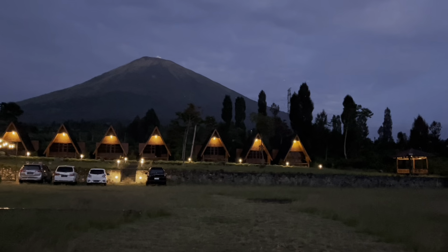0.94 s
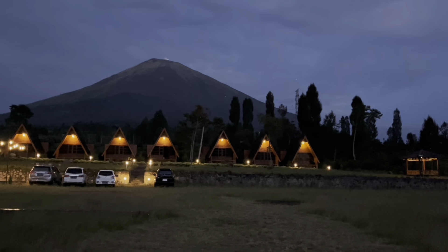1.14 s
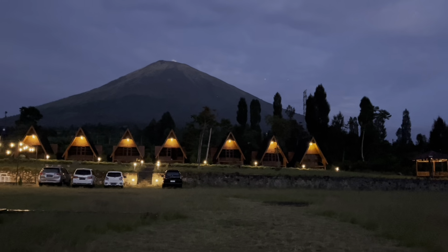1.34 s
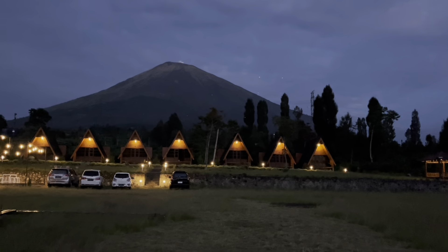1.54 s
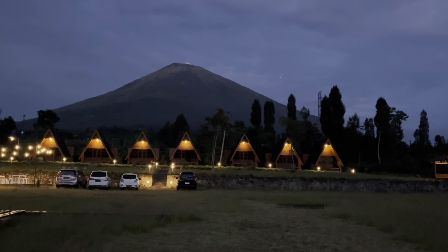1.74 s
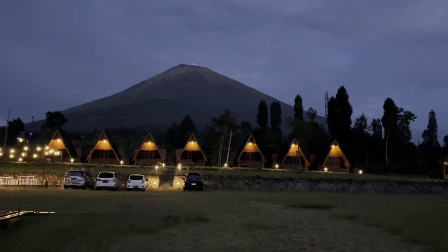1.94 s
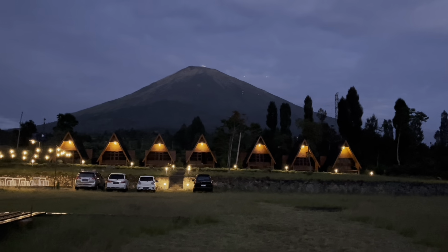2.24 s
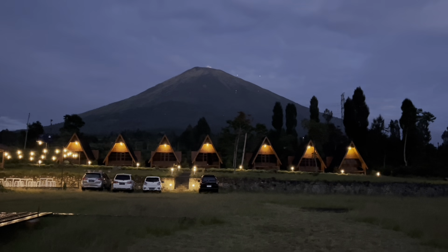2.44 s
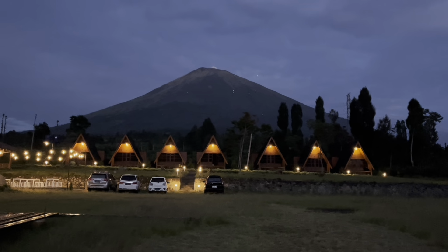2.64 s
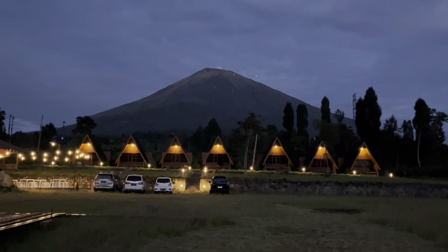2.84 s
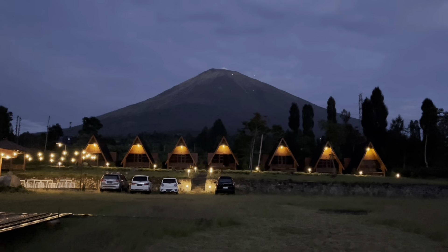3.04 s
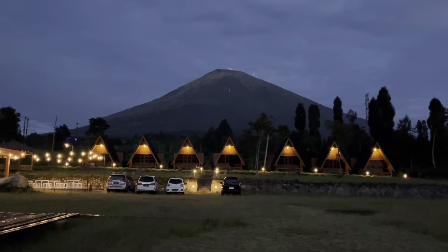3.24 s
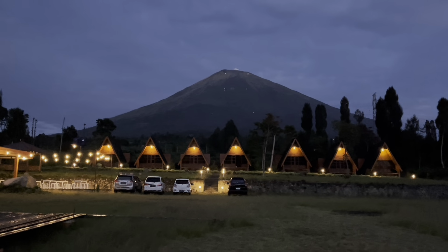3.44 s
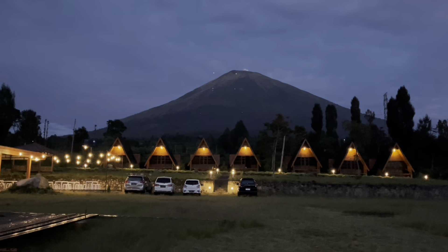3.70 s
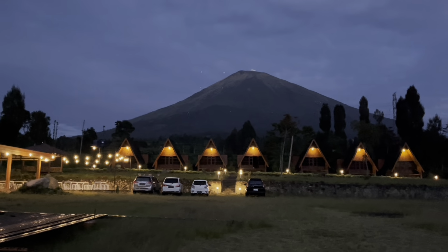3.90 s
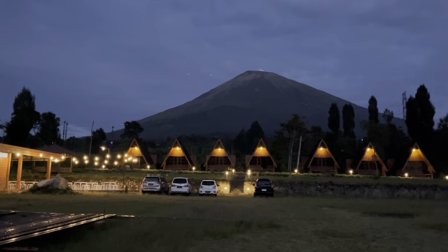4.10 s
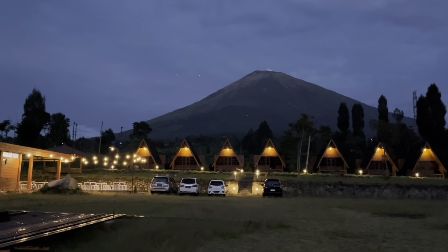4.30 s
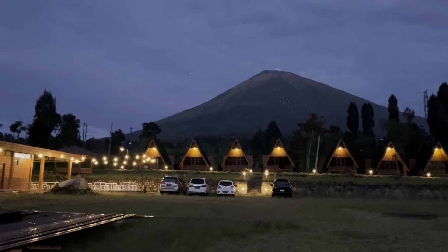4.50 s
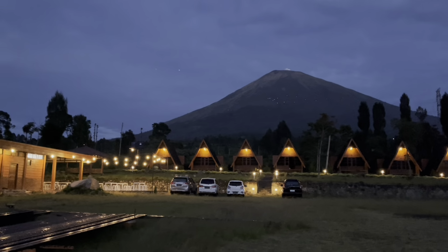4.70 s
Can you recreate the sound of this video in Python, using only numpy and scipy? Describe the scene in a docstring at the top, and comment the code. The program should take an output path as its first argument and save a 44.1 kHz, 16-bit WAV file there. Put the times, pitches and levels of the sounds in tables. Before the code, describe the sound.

Constant bright birdsong twitters across a quiet campground at dusk, above deep rumbling and the faint puttering of a distant motorbike.

```python
"""Dawn chorus on an open mountain field: small birds chirp, slur and trill as curved, gated sine glides.
Hundreds of farther notes and a noise haze merge into a twitter; decaying noise makes the tree-line echo.
Under it lie a low, lumpy rumble and the soft rush of the valley, both shaped noise, and a far
motorbike of puffs and thumps. A faint horn of two partials and a few dry noise ticks stand apart."""
import sys
import numpy as np
from scipy import signal
from scipy.fft import rfft, irfft, next_fast_len
from scipy.io import wavfile
from scipy.ndimage import uniform_filter1d, map_coordinates

SR = 44100
rng = np.random.default_rng(int(sys.argv[2]) if len(sys.argv) > 2 else 0)


def unload_audio(sound):
    """Save the sound as a 16-bit wav file, at the path given as the first command line argument."""
    columns = np.transpose(np.atleast_2d(sound))
    # keep every value between -1 and 1, then stretch to whole-number steps
    steps = np.round(np.clip(columns, -1, 1) * 32767)
    wavfile.write(sys.argv[1], SR, steps.astype(np.int16))


N = 214279
PORT_LAG = 0.0004245  # travel time of sound from the left port to the right (s)


def amp(db):
    """Decibels to gain."""
    return 10 ** (np.asarray(db) / 20)


def unit(x):
    """Scale to rms 1."""
    return x / np.sqrt(np.mean(x ** 2) + 1e-20)


def along(points, hz):
    """Read (f/Hz, value) points on a log frequency axis."""
    f, v = np.transpose(points)
    return np.interp(np.log(hz + 1), np.log(f + 1), v)


def curve(rows):
    """One value per sample from (t/s, value) rows."""
    return np.interp(np.arange(N) / SR, *np.transpose(rows))


def wobble(rate, size):
    """A smooth random curve, rate knots a second."""
    knots = rng.standard_normal(int(size * rate / SR) + 4)
    return map_coordinates(knots, [np.arange(size) * rate / SR])


def filtered(x, response):
    """x through a complex response of frequency."""
    m = next_fast_len(N + SR // 2)
    return irfft(rfft(x, m) * response(np.fft.rfftfreq(m, 1 / SR)), m)[..., :N]


def add(track, s, sound):
    """Mix a stereo sound into the track at time s."""
    start = max(round(s * SR), 0)
    part = track[:, start:start + sound.shape[1]]
    part += sound[:, :part.shape[1]]


def rush(spectrum, alike, pan_db=0):
    """Stereo noise of rms 1 that reaches the left port first; likeness sets the mid-side balance."""
    def mid_side_gains(hz):
        turn = np.arccos(np.clip(along(alike, hz), -1, 1)) / 2
        return amp(along(spectrum, hz)) * [np.cos(turn), np.sin(turn)]

    mid, side = filtered(rng.standard_normal((2, N)), mid_side_gains)
    right = filtered(mid - side, lambda hz: np.exp(-2j * np.pi * hz * PORT_LAG))
    return unit(np.array([amp(pan_db) * (mid + side), right]))


# A few faint dry ticks: t/s, level/dB (before gain and colour)
TICK_TIMES = [(0.2348, -70), (1.1742, -65), (3.446, -72)]
# Colour of a tick: f/Hz, gain/dB
TICK_COLOUR = [(800, -36), (2500, -5), (5000, 19), (7500, -8), (13000, -23)]


def ticks(t60=0.035, gain_db=9):
    """Faint dry ticks: bursts of noise that die within a blink, filtered to one colour."""
    track, t = np.zeros((2, N)), np.arange(SR // 20) / SR
    for s, db in TICK_TIMES:
        decay = amp(db + gain_db - 60 * t / t60)
        add(track, s - .002, decay * rng.standard_normal((2, len(t))))
    return filtered(track, lambda hz: amp(along(TICK_COLOUR, hz)))


# A faint far horn, one toot: t/s, length/s, f/Hz, level/dB
HORN_TOOT = (2.67, .25, 511, -53)


def horn(overtone_db=-12):
    """One soft toot from down the valley: a slightly unsteady tone and its octave."""
    s, length, hz, db = HORN_TOOT
    t = np.arange(N) / SR
    gate = np.sqrt(np.abs(np.sin(np.pi * np.clip((t - s) / length, 0, 1))))
    phase = 2 * np.pi * np.cumsum(hz + 2.1 * wobble(30, N)) / SR
    return amp(db) * gate * unit(np.sin(phase) + amp(overtone_db) * np.sin(2 * phase))


# A far one-cylinder motorbike: t/s, firing rate f/Hz, level/dB (before trim)
BIKE_RIDE = [(0, 23, -73), (1, 25.6, -51), (1.4, 27, -45), (1.898, 27, -44), (2.303, 25.8, -48),
             (2.749, 24.5, -45.5), (3.303, 26, -44), (3.699, 26.7, -52.5), (4.203, 26.6, -45),
             (4.86, 25.7, -47)]
# What is left of the exhaust colour: f/Hz, relative level/dB
EXHAUST_COLOUR = [(110, -29.5), (200, -2), (300, 6), (420, 2.5), (520, -4.5), (680, -9.5), (1200, -48.5),
                  (3000, -120)]


def motorbike(db=-1.9, pop_t60=0.044, scatter_db=0.8, pan_db=-7.5, thump_db=6):
    """Each firing sends out a thump and a short puff; distance leaves only their low middle."""
    s, rate, level_db = np.transpose(BIKE_RIDE)
    turns = np.cumsum(curve(np.column_stack([s, rate]))) / SR
    since_firing = turns % 1 / np.mean(rate)  # seconds, at the mean rate
    size_db = scatter_db * rng.standard_normal(int(turns[-1]) + 1)[turns.astype(int)]
    puffs = unit(amp(-60 * since_firing / pop_t60) * rng.standard_normal(N))
    thumps = unit(np.diff(np.floor(turns), prepend=0))

    def exhaust_at_ports(hz):
        ports = np.array([amp(pan_db) * np.ones_like(hz), np.exp(-2j * np.pi * hz * PORT_LAG)])
        return amp(along(EXHAUST_COLOUR, hz)) * ports

    pops = filtered(amp(size_db) * (puffs + amp(thump_db) * thumps), exhaust_at_ports)
    return amp(db + curve(np.column_stack([s, level_db]))) * unit(pops)


# Slow fader of the valley: t/s, level/dB (before trim)
VALLEY_FADER = [(0, -47.5), (1, -47), (1.8, -45.5), (2.8, -46.5), (4.86, -44.5)]
# Colour of the valley: f/Hz, relative level/dB
VALLEY_COLOUR = [(100, -11), (220, 0), (310, 2), (400, -2), (580, -9), (950, -6), (1500, -14), (2200, -17),
                 (3500, -24.5), (5000, -32.5), (6500, -45), (9500, -50), (13000, -44)]
# Width of the valley: f/Hz, left-right likeness (1 = same)
VALLEY_WIDTH = [(300, 0.52), (600, 0.6), (900, 0.3), (1500, 0.49), (4000, 0.56)]


def valley(db=1.5):
    """The soft rush of distant air and traffic: broad noise on a slow fader."""
    return amp(db + curve(VALLEY_FADER)) * rush(VALLEY_COLOUR, VALLEY_WIDTH)


# Colour of the rumble: f/Hz, relative level/dB
RUMBLE_COLOUR = [(20, -39), (31, -20.5), (40, -9), (52, -2.5), (70, 2.5), (100, -6), (135, -6.5),
                 (175, -15.5), (230, -30.5), (400, -78), (1500, -120)]
# Width of the rumble: f/Hz, left-right likeness (1 = same)
RUMBLE_WIDTH = [(50, 0.7), (110, 0.27), (250, 1)]
# Brief swells of the rumble: t/s, rise in level/dB
RUMBLE_SWELLS = [(0.331, 7.5), (0.57, 4.5), (0.85, 3.5), (1.37, 5.5), (1.85, 4.5), (2.25, 9), (2.499, 6),
                 (2.571, 6.5), (3.3, 2.5), (3.871, 3), (4.63, 5.5)]


def rumble(level_db=-29.5, swell_s=0.025, evenness=0.11, waver_db=-0.51):
    """A low, lumpy drone of slightly evened noise that wavers and now and then swells."""
    drone = rush(RUMBLE_COLOUR, RUMBLE_WIDTH, pan_db=-0.6)
    power = np.abs(uniform_filter1d(np.mean(drone ** 2, axis=0), SR // 16)) + 1e-6
    t = np.arange(N) / SR
    swell_db = sum(rise_db * np.exp(-((t - s) / swell_s) ** 2) for s, rise_db in RUMBLE_SWELLS)
    level = amp(level_db + swell_db + waver_db * wobble(22.12, N))
    return level * unit(drone / power ** (evenness / 2))


def syllable(length, glide_hz, pan_db, bearing, trill_hz=0, trill_rate=0, edge=0.00662, waver_hz=10,
             flutter_db=1.43, dip_db=7, overtone_db=-46):
    """One whistled note: a curved glide, which a trill breaks into a chain of little arches."""
    t = np.arange(int((max(length, .01) + edge) * SR)) / SR
    u = np.clip((t - edge / 2) / length, 0, 1)
    glide = np.polyval(np.polyfit([0, .5, 1], glide_hz, 2), u)
    arch = np.abs(np.sin(np.pi * trill_rate * (t - edge / 2))) - 2 / np.pi
    trilling = np.clip(trill_hz / 300, 0, 1)
    knots = rng.standard_normal((2, 64))
    waver, flutter = [map_coordinates(k, [t * 200], mode="mirror") for k in knots]
    # trilled notes are also less steady in pitch
    pitch = glide + trill_hz * arch + waver_hz * (1 + 1.86 * trilling) * waver
    # a bird to one side reaches the farther port later
    lag = np.array([[0], [PORT_LAG * np.sin(np.radians(bearing))]])
    phase = 2 * np.pi * (np.cumsum(pitch) / SR - pitch * lag)
    gate = np.sin(np.pi / 2 * np.clip(np.minimum(t, t[-1] - t) / edge, 0, 1)) ** 2
    swell = 1.0 + 0.2 * np.sin(np.pi * u)
    # with dip_db, the voice drops between arches
    loudness = unit(gate * swell * amp(flutter_db * flutter + dip_db * trilling * arch))
    ports = unit(amp([[pan_db / 2], [-pan_db / 2]]))
    return ports * loudness * (np.sin(phase) + amp(overtone_db) * np.sin(2 * phase))


def notes(rows, first, last, trill_hz=0, trill_rate=0, db=0, waver_hz=20, lead=0.00199,
          usual_s=0.042, stretch=.35):
    """Glide from first to last semitones about each middle pitch; longer notes glide farther."""
    song = np.zeros((2, N))
    octaves = np.array([first, 0, last]) / 12
    for s, length, hz, level_db, pan_db, bearing in rows:
        glide_hz = hz * 2 ** (octaves * (length / usual_s) ** stretch)
        note = syllable(length, glide_hz, pan_db, bearing, trill_hz, trill_rate, waver_hz=waver_hz)
        add(song, s - lead, amp(db + level_db) * note)
    return song


def perched(rows, pan_db, bearing):
    """Give all the rows one direction."""
    return [(*row, pan_db, bearing) for row in rows]


# Colour of the distant twitter: f/Hz, relative level/dB
TWITTER_COLOUR = [(1000, -65.5), (1600, -32.5), (1950, -10.5), (2300, -11), (2800, -9.5), (3250, -5),
                  (3700, -5.5), (4400, -20.5), (5200, -20.5), (6200, -47.5), (9000, -89.5)]


def haze(level_db=-11, swing_db=2.7):
    """The blur of the farthest birds: twitter-coloured noise with a restless level."""
    level = amp(level_db + swing_db * wobble(8.0, N))
    return level * rush(TWITTER_COLOUR, [(3000, 0.066)], pan_db=12.0)


def far_birds(count=800, low_hz=2250, high_hz=3150, slide=0.0626, length=0.035, trill_hz=150,
              trill_rate=58, scatter_db=1.2):
    """A crowd of like notes from all sides, dulled by distance."""
    song = np.zeros((2, N))
    times = (np.arange(count) + rng.random(count)) / count * N / SR
    pitches = low_hz * (high_hz / low_hz) ** rng.random(count)
    variations = rng.standard_normal((count, 8))
    for s, hz, (slope, bend, span, depth, speed, size, side, turn) in zip(times, pitches, variations):
        fall = np.exp(slide * (slope + .5))
        glide_hz = hz * fall, hz * np.exp(0.0329 * bend), hz / fall
        trill = trill_hz * abs(depth), trill_rate * np.exp(0.23 * speed)
        note = syllable(length * np.exp(0.22 * span), glide_hz, 2 + 4 * side, 35 * turn, *trill)
        add(song, s - length / 2, amp(scatter_db * size) * note)
    # half the colour in dB: the notes already lie in the twitter's band
    return unit(filtered(song, lambda hz: amp(along(TWITTER_COLOUR, hz) / 2)))


# Decay of the tree-line echo: f/Hz, t60/s
TREE_DECAY = [(1000, 0.34), (3000, 0.25), (9000, 0.22)]


def tree_line(x, delay=0.0083):
    """Trunks and leaves scatter the song into a soft tail, different at each port."""
    hz, t, z = signal.stft(rng.standard_normal((2, SR * 3 // 4)), SR, nperseg=256)
    decay = amp(-60 * t / along(TREE_DECAY, hz)[:, None])
    build_up = 1 - np.exp(-t / delay)
    tail = signal.istft(z * decay * build_up, SR, nperseg=256)[1]
    return signal.fftconvolve(x, tail / np.linalg.norm(tail[0]), axes=1)[:, :N]


# Very high, thin squeaks: t/s, length/s, f/Hz, level/dB (before trim)
SQUEAK_NOTES = [(0.313, 0.027, 9800, -70), (0.328, .026, 7100, -70), (0.438, 0.053, 9400, -67),
                (1.41, 0.035, 10160, -71), (1.555, 0.034, 6150, -68.5), (1.772, 0.016, 7322, -73),
                (2.225, 0.031, 9600, -74), (2.328, 0.033, 9100, -76), (4.29, 0.022, 8900, -80)]


def squeaks():
    """Very high, thin trilled notes that sag slightly."""
    return notes(perched(SQUEAK_NOTES, pan_db=0.0, bearing=4.9), first=0.38, last=-0.45,
                 trill_hz=420, trill_rate=62, db=-1.0)


# Thin trills about one pitch: t/s, length/s, f/Hz, level/dB (before trim)
THIN_TRILL_NOTES = [(0.054, 0.062, 4100, -59), (0.0026, .29, 5080, -69.5)]


def thin_trills():
    """Long, thin trills that arch about a level pitch."""
    return notes(perched(THIN_TRILL_NOTES, pan_db=13.0, bearing=5.4), first=0.035, last=0.073,
                 trill_hz=220, trill_rate=64, db=1.5)


# Nearly level rasps: t/s, length/s, f/Hz, level/dB (before trim)
RASP_NOTES = [(0.622, 0.023, 4150, -58), (0.641, 0.11, 4190, -49.5), (0.648, 0.025, 3710, -47.5)]


def rasps():
    """Nearly level notes with arches too fast to hear as a trill."""
    return notes(perched(RASP_NOTES, pan_db=5.5, bearing=0.81), first=.15, last=-0.079,
                 trill_hz=330, trill_rate=215, db=-0.5, waver_hz=22)


# Short rising buzzes: t/s, length/s, f/Hz, level/dB (before trim)
BUZZ_NOTES = [(1.228, 0.024, 3800, -55.5), (1.322, 0.027, 3950, -56), (1.446, 0.016, 3830, -51),
              (1.605, 0.025, 3660, -53), (2.125, 0.048, 3700, -60.5), (3.125, 0.07, 3770, -59.5),
              (3.262, 0.037, 4050, -57), (3.345, 0.032, 4280, -58), (3.428, 0.024, 4610, -58.5),
              (3.565, 0.02, 4540, -60), (3.835, 0.031, 4150, -63), (4.238, 0.061, 3780, -53),
              (4.272, 0.046, 4340, -59), (4.368, 0.022, 3550, -52.5), (4.372, 0.02, 4400, -60)]


def buzzes():
    """Short rising notes roughened by very fast arches."""
    return notes(perched(BUZZ_NOTES, pan_db=6.0, bearing=7.4), first=-1.0, last=0.6,
                 trill_hz=340, trill_rate=215, db=2.0, waver_hz=30)


# One bird's runs of high chips: t/s, f/Hz, level/dB (before scatter and trim)
CHIP_RUNS = [(1.125, 4300, -57), (1.186, 4430, -57.5), (1.252, 4450, -55), (1.321, 4500, -56),
             (1.393, 4440, -55), (1.464, 4400, -57), (2.636, 4780, -59.5), (2.684, 4600, -63)]


def chipper(length=0.025, scatter_db=-0.5):
    """One bird ticks off chips that drop ever faster, each a little different."""
    rows = [(s, length, hz, db + scatter_db * rng.standard_normal()) for s, hz, db in CHIP_RUNS]
    return notes(perched(rows, pan_db=4.5, bearing=-6.0), first=0.72, last=-1.5, db=1.0, waver_hz=24)


# A faint bird's drawn-out whistles: t/s, length/s, f/Hz
WHISTLE_NOTES = [(1.32, 0.28, 2137), (2.081, 0.3, 2075), (2.641, 0.086, 2136), (2.918, 0.25, 2070),
                 (3.722, .22, 2060), (4.406, 0.12, 2110)]


def long_whistles(level_db=-55):
    """A faint bird draws out a slowly rising pure note."""
    rows = [(*row, level_db) for row in WHISTLE_NOTES]
    return notes(perched(rows, pan_db=2.5, bearing=1.5), first=-0.42, last=0.39)


# One bird's repeated low slur: t/s, length/s, f/Hz, level/dB (before trim), left-right/dB
SLUR_NOTES = [(0.116, 0.047, 2276, -34.5, -0.5), (0.899, 0.046, 2272, -36, 0),
              (1.675, 0.05, 2388, -37, 3.5), (2.444, 0.041, 2327, -34, 5.5),
              (2.922, 0.027, 2350, -35.5, 6.5), (3.327, 0.043, 2330, -35, 5.5)]


def slurs(bearing=-6.5):
    """One bird repeats a low falling note that flattens out."""
    rows = [(*row, bearing) for row in SLUR_NOTES]
    return notes(rows, first=1.2, last=-0.5, db=-2.0)


# Peeps: t/s, length/s, f/Hz, level/dB (before trim), left-right/dB, bearing/degrees to the left
PEEP_NOTES = [(0.002, 0.0061, 2870, -38.5, 3, 10), (0.236, 0.012, 2720, -43, -1, -2.5),
              (0.275, 0.066, 2640, -47.5, -3, -3), (0.388, 0.046, 3100, -40.5, 2.5, 19),
              (0.517, 0.042, 3124, -36.5, 1, 11), (1.29, 0.048, 2355, -43.5, 11, 14),
              (1.56, 0.083, 2780, -43.5, 6.5, -9), (1.865, 0.039, 3190, -53, 3, 12.5),
              (1.885, 0.086, 2290, -45, 7.5, -13.5), (2.175, 0.032, 2515, -44.5, 1, 0),
              (3.822, 0.021, 2360, -48, 4, 9), (2.28, 0.04, 3167, -40, 0.5, 8),
              (3.625, 0.037, 2646, -39.5, 8, 20.5), (3.675, 0.14, 2686, -42.5, 10, 19),
              (3.73, 0.011, 2505, -34.5, 5.5, 9), (3.792, 0.017, 2975, -45.5, 18, 13),
              (3.88, 0.02, 2954, -38, 5.5, 16), (4.365, 0.047, 2583, -45.5, 0, -0.5),
              (4.477, 0.017, 3260, -41, 1, 6.5), (4.635, 0.11, 2683, -40, 4, 19.5),
              (3.25, 0.09, 2800, -49, 4, 5), (4.06, 0.076, 2790, -55, 1, 10),
              (4.71, 0.0085, 2980, -40, 2, 13), (4.79, 0.024, 2634, -37.5, 4, 15)]


def peeps():
    """Birds all around peep on almost one pitch."""
    return notes(PEEP_NOTES, first=-0.14, last=-0.11, db=2.5, waver_hz=5.6)


# Notes that scoop, arch or drop: t/s, length/s, first f/Hz, middle f/Hz, last f/Hz,
# level/dB (before trim), left-right/dB, bearing/degrees to the left
GLIDE_NOTES = [(0.039, 0.032, 3490, 3120, 2610, -46, 4, 13),
               (0.072, 0.031, 2480, 2400, 2460, -46.5, 3, -3.5),
               (0.087, .018, 3570, 3280, 3050, -46, 3, 21.5),
               (0.089, 0.035, 2720, 2600, 2400, -46, 0.5, -9), (0.104, 0.029, 2834, 2750, 2950, -44, 2, 5),
               (0.136, 0.043, 3250, 2980, 3090, -46, -3, 9), (.307, 0.034, 3060, 3230, 3290, -39, 6.5, -4),
               (.485, 0.051, 3200, 2810, 2450, -42, 6, -6), (0.525, 0.013, 2610, 2200, 1650, -50, 2.5, -3),
               (0.826, 0.041, 3080, 2530, 2460, -46, 2, -11),
               (1.003, 0.029, 3470, 3400, 3310, -53.5, 5.5, 10),
               (1.018, 0.035, 3000, 2720, 2450, -64, -1, 0), (1.112, 0.033, 3100, 2960, 2710, -47.5, -5, 4),
               (1.235, .016, 3100, 3490, 3640, -43.5, 4, -17),
               (1.277, 0.025, 1910, 1930, 2440, -51.5, 4, 26),
               (1.488, 0.027, 3450, 3300, 2860, -44.5, 7, -9.5),
               (1.524, 0.031, 3620, 3470, 3130, -47, 6, -7.5), (1.61, .04, 3170, 2960, 2790, -46, 12, -11),
               (1.611, 0.033, 2894, 2530, 2500, -45.5, 0, 15), (1.622, .017, 2220, 2140, 2070, -46, 2, -4),
               (1.753, 0.024, 3620, 3930, 3520, -49, 7, 11),
               (1.835, 0.02, 2767, 2550, 2490, -44.5, 11, -10),
               (1.933, 0.032, 2360, 2385, 2720, -42.5, 7.5, -14),
               (1.979, 0.035, 3120, 3073, 3004, -38, 2, 13.5),
               (2.025, 0.078, 2430, 2520, 2480, -47.5, 0.5, -3.5),
               (2.07, 0.042, 2990, 2930, 2950, -39, -1, 10), (2.184, .063, 2870, 3155, 3080, -44, 5, 13),
               (2.213, 0.065, 2655, 2510, 2200, -42.5, -0.5, -2),
               (2.288, 0.032, 2110, 2000, 1870, -50.5, 5, -20),
               (2.482, 0.026, 4180, 4070, 3390, -61, 13, -9),
               (2.486, 0.021, 2695, 2650, 2310, -44, 19.5, -29),
               (2.519, 0.037, 2490, 2800, 2920, -41, 8, -28),
               (2.55, 0.074, 2770, 2607, 2500, -39.5, 5, -18),
               (2.627, 0.021, 2240, 1895, 1530, -49.5, 5, -12),
               (2.675, 0.039, 2616, 2560, 2370, -47, 0, -2), (2.796, 0.072, 2880, 2830, 2710, -46.5, 3, 20),
               (2.832, 0.044, 2187, 2420, 2906, -44, 5, -6), (3.211, 0.018, 3700, 3070, 2740, -48.5, 1, 13),
               (3.396, 0.028, 2570, 2750, 2620, -45.5, -1.5, 4.5),
               (3.419, 0.029, 2546, 2780, 3160, -41, 0, 8.5),
               (3.445, 0.028, 3000, 2624, 2300, -44.5, -2.5, -1.5),
               (3.556, 0.039, 2695, 2910, 2860, -48, 13, 23),
               (3.766, 0.026, 3520, 3220, 2880, -39.5, 2, 15), (3.793, 0.016, 2960, 3030, 2680, -36, 9, 11),
               (3.894, 0.036, 3374, 3060, 2850, -43, 6, 11), (3.943, 0.015, 2620, 2440, 2480, -43, 5, 10),
               (4.297, 0.043, 3035, 2570, 2256, -49, -1, 4), (4.454, 0.018, 2930, 3015, 3480, -38, 0, 8.5),
               (4.513, 0.016, 3870, 3600, 3000, -56, 4, 9.5),
               (4.527, 0.022, 2945, 2830, 2830, -34, -2.5, 6),
               (4.544, 0.027, 2850, 3100, 3050, -37.5, 0, 12.5),
               (4.572, 0.027, 3194, 3150, 2900, -34.5, 2.5, 11),
               (4.581, 0.038, 2663, 2540, 2970, -39, 0, -5), (4.611, 0.043, 2870, 2680, 2230, -43, 1, 7),
               (4.623, 0.01, 3380, 3430, 3660, -42.5, 3.5, -16.5),
               (4.649, 0.019, 3536, 3410, 3230, -39, 5, -14.5),
               (4.77, 0.024, 2640, 2380, 1960, -46.5, 18, 30)]


def glides(trim_db=2.5, rough_hz=15, rough_rate=50, lead=0.001989):
    """Nearly pure notes bend through three pitches, with a trace of trill."""
    song = np.zeros((2, N))
    for s, length, *glide_hz, db, pan_db, bearing in GLIDE_NOTES:
        note = syllable(length, glide_hz, pan_db, bearing, rough_hz, rough_rate)
        add(song, s - lead, amp(db + trim_db) * note)
    return song


# Trills, mostly falling: t/s, length/s, first f/Hz, middle f/Hz, last f/Hz, level/dB (before trim),
# left-right/dB, bearing/degrees to the left, trill depth f/Hz, arch rate f/Hz
TRILL_NOTES = [(0.001, 0.055, 3240, 3050, 2880, -37, 1, 18.5, 220, 32.8),
               (0.326, 0.051, 3420, 3620, 3330, -48, 0, -9, 380, 65),
               (0.382, 0.043, 2820, 3006, 2710, -39.5, 0, 1, 480, 33),
               (0.406, 0.11, 3420, 3250, 3130, -39.5, 6, -8.5, 260, 50),
               (0.534, 0.048, 3285, 3410, 3000, -52.5, 3, 5, 382, 57),
               (0.569, 0.04, 3030, 2755, 2400, -41.5, -2.5, 4.5, 500, 57),
               (0.696, 0.074, 3820, 3360, 2990, -38, 2.5, 14.5, 398, 65),
               (0.778, 0.04, 3330, 3320, 3100, -46, 7, -3, 120, 45),
               (0.916, 0.038, 3390, 3350, 3400, -48.5, 3, 14.5, 120, 49),
               (1.133, 0.053, 3490, 3177, 2990, -38, 2, 3, 300, 66),
               (1.307, 0.043, 3190, 3175, 2840, -39, 7, 12, 290, 32),
               (1.349, 0.034, 3310, 3276, 3260, -37, 9, -5.5, 261, 64),
               (1.385, 0.053, 3800, 3475, 3120, -39, 3, 17.5, 480, 46),
               (1.389, 0.052, 3080, 3150, 3370, -42, 1, -1, 200, 74),
               (1.681, 0.032, 3110, 3085, 3110, -43.5, 2, 9, 120, 35),
               (1.755, 0.039, 3380, 3220, 2920, -37.5, 1, 7, 398, 62),
               (1.78, 0.032, 3334, 3280, 3100, -36.5, 0, 13, 220, 60),
               (2.33, 0.057, 2955, 2834, 2520, -37.5, 17, -25, 220, 35),
               (2.404, 0.04, 3190, 2970, 2880, -41.5, 1.5, 2, 169, 58),
               (2.898, 0.051, 2746, 2626, 2470, -39.5, 0, 2, 488, 47),
               (2.999, 0.059, 3415, 3177, 2965, -38, 10.5, 22, 279, 54),
               (3.236, 0.061, 3050, 3186, 3390, -39.5, 4.5, 17, 300, 42),
               (3.443, 0.036, 3086, 3250, 3150, -43.5, 4, 13, 380, 57),
               (3.516, 0.031, 3060, 3310, 3530, -45, 1.5, 7, 382, 52),
               (3.62, 0.035, 3270, 3330, 3370, -42.5, 6.5, -18.5, 290, 37),
               (4.545, 0.021, 3480, 3620, 3470, -52, 1, 9, 300, 65),
               (4.599, 0.06, 3500, 3700, 3500, -55, 3, -2.5, 380, 31)]


def trills(trim_db=1.0, lead=0.001989):
    """Gliding notes ripple in pitch, without a drop in level between arches."""
    song = np.zeros((2, N))
    for s, length, *glide_hz, db, pan_db, bearing, depth_hz, rate in TRILL_NOTES:
        note = syllable(length, glide_hz, pan_db, bearing, depth_hz, rate, dip_db=0)
        add(song, s - lead, amp(db + trim_db) * note)
    return song


# Fader of the far birds: t/s, level/dB (scales crowd and haze together)
FAR_FADER = [(0.0, -41), (0.16, -49), (0.49, -45), (1.01, -48.5), (1.18, -47.5), (1.56, -45), (2.08, -49.5),
             (2.42, -46.5), (2.69, -47), (3.27, -48.5), (3.42, -48), (3.84, -46.5), (4.02, -47),
             (4.38, -48), (4.57, -47.5), (4.86, -46)]


def chorus(high_db=-0.2, high_echo_db=-6, echo_db=-8.5, far_db=0.67, far_echo_db=-6.0):
    """Near birds with their echo, over the far crowd and the blur of the farthest."""
    near = peeps() + glides() + trills() + slurs() + long_whistles()
    far = far_birds()
    high = chipper() + buzzes() + rasps() + thin_trills() + squeaks()
    # the high voices sit deeper in the trees
    high = amp(high_db) * high
    high = high + amp(high_echo_db) * tree_line(high / amp(high_db))
    crowd = amp(far_db) * unit(far + amp(far_echo_db) * tree_line(far))
    distant = amp(curve(FAR_FADER)) * (crowd + haze())
    return near + amp(echo_db) * tree_line(near) + high + distant


def scene():
    """Birds above the rumble, the valley and its far traffic."""
    return ticks() + horn() + motorbike() + valley() + rumble() + chorus()


def record(dry, top_hz=13800):
    """The sound eases in and out, and nothing passes above the microphone's band limit."""
    ease = signal.windows.tukey(N, .001)
    return filtered(dry * ease, lambda hz: hz < top_hz)


dry = scene()
out = record(dry)
unload_audio(out)
```